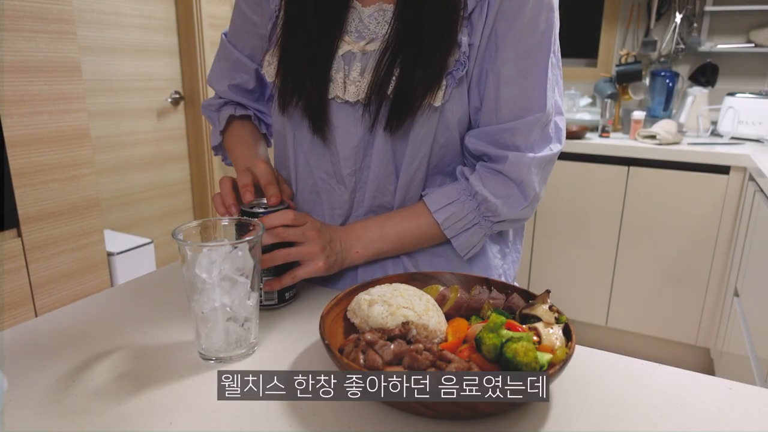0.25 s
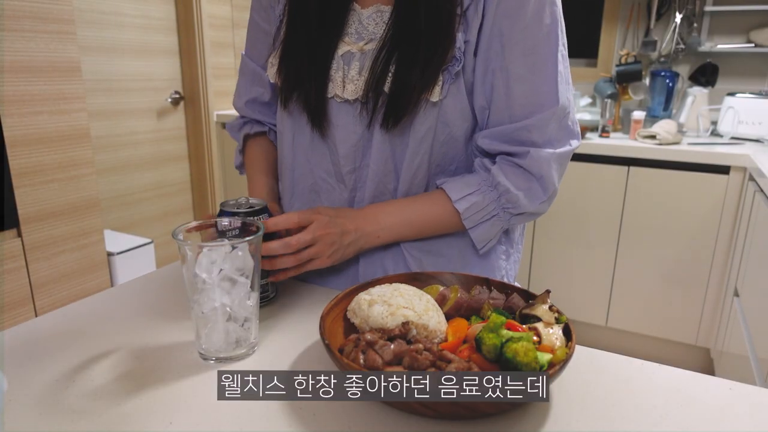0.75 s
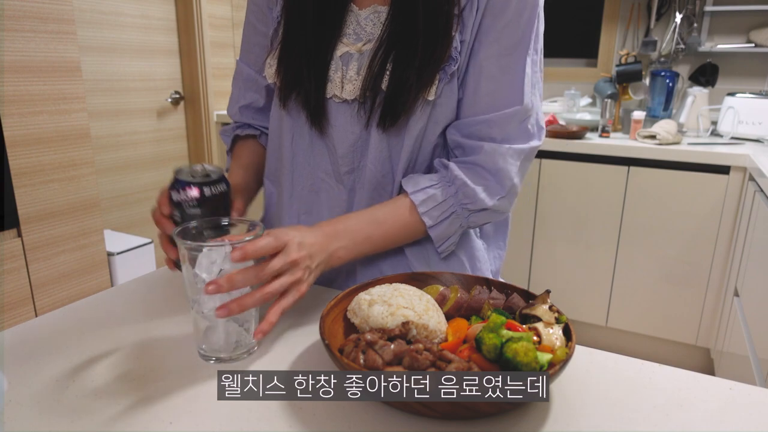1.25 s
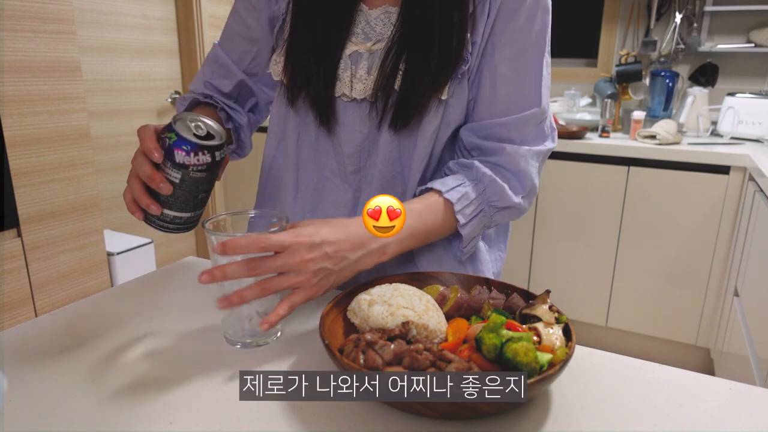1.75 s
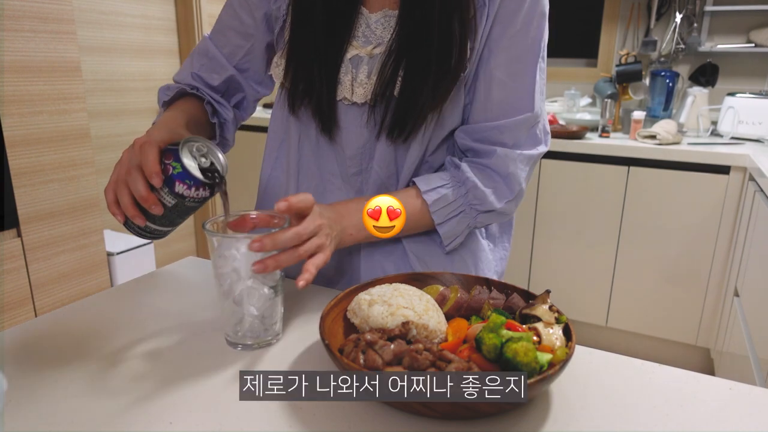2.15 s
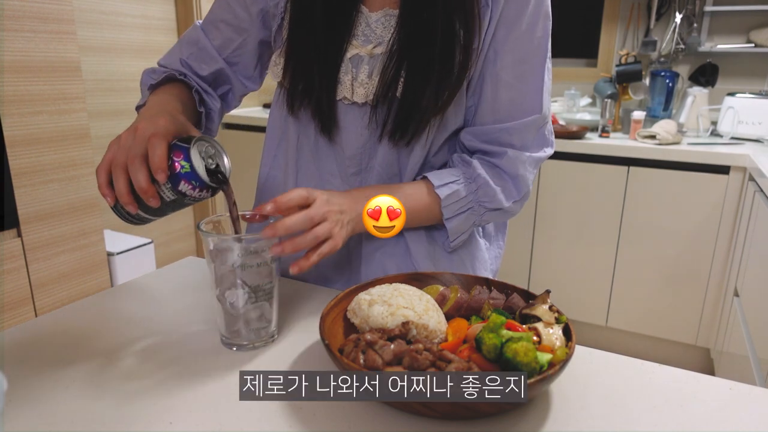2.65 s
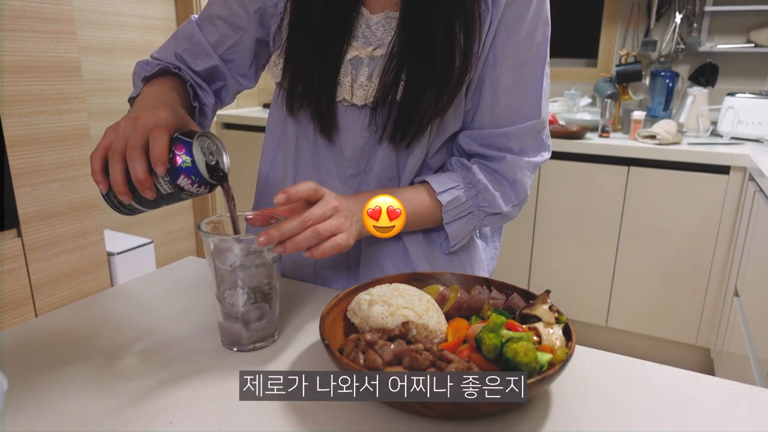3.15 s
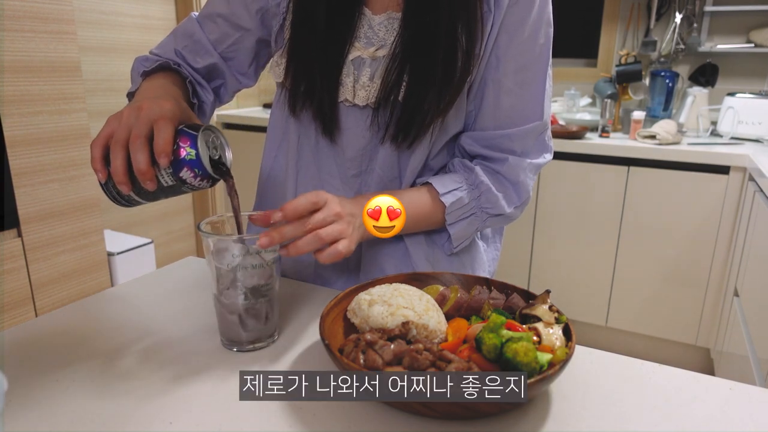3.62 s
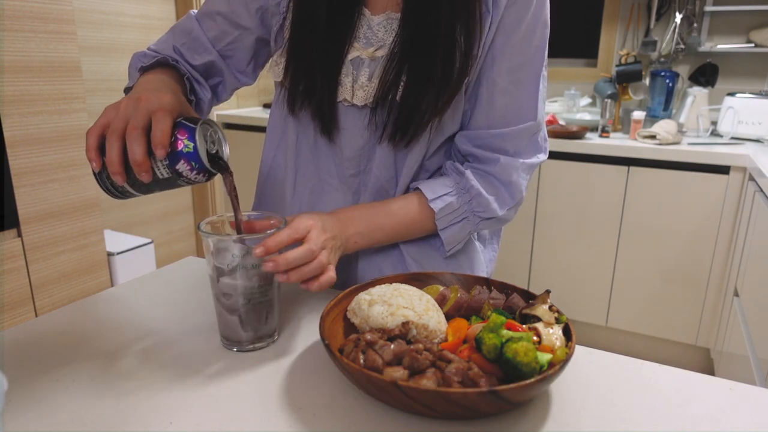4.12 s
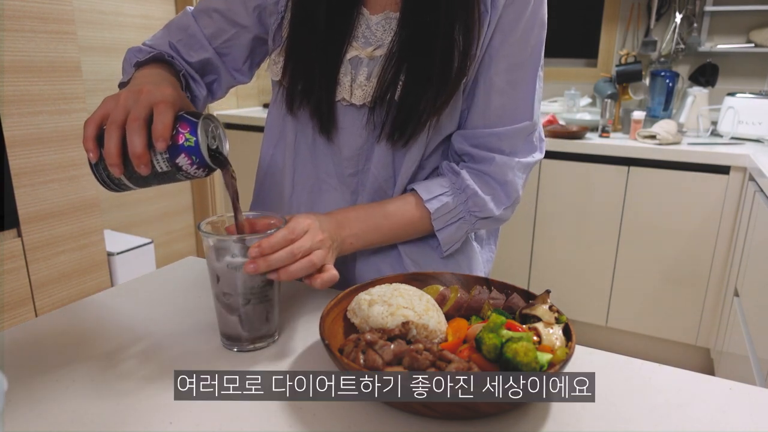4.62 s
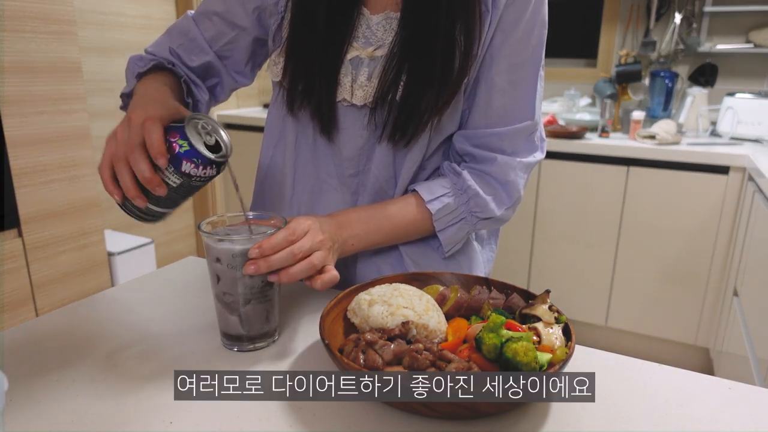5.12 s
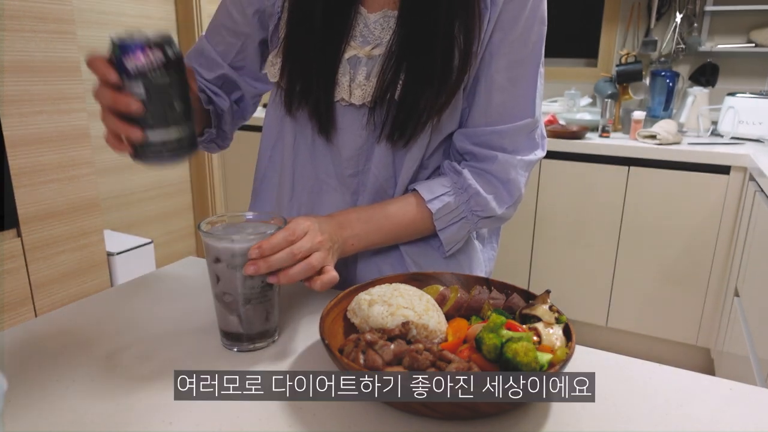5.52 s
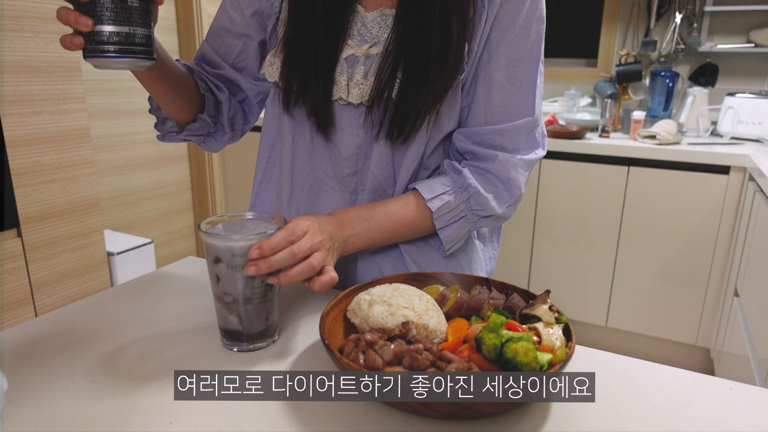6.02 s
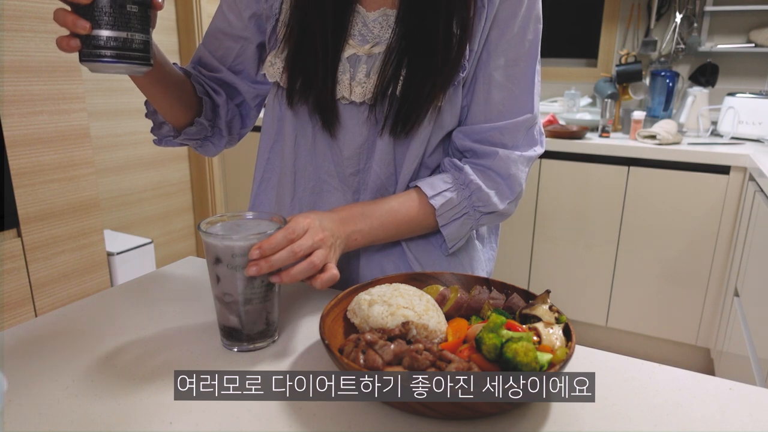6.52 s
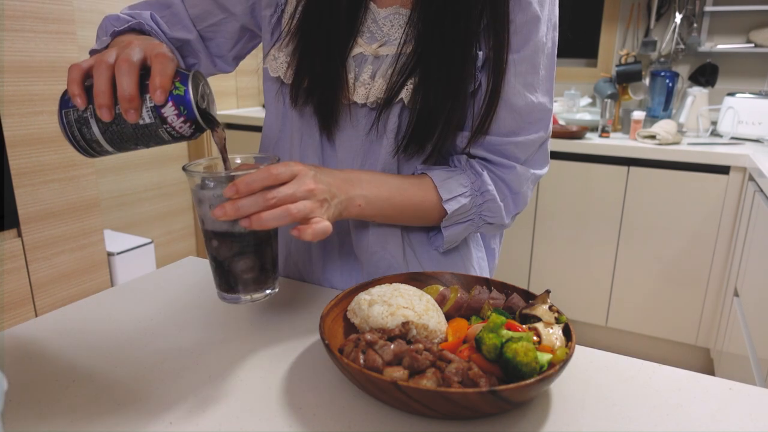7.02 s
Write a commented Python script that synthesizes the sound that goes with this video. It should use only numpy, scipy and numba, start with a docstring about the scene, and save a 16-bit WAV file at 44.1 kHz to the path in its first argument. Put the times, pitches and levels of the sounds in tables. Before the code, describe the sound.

A soda can snaps open, a glass knocks on a table, and soda pours over cracking ice with a swelling fizz.

```python
"""In a hard-walled kitchen, a soda can snaps open and a glass of ice slides and knocks twice on the table. The
soda trickles in: bubbles ping, the cubes crack and tick, and the shrinking air column rises in pitch. The tiny
bursts of the fizz swell and merge into a smooth hiss of foam, which drops abruptly to a finer, softer one near
the end."""
import sys
import numpy as np
from scipy import signal
from scipy.fft import rfft, irfft, next_fast_len
from scipy.io import wavfile
from scipy.ndimage import uniform_filter1d
from numba import njit

SR = 44100
rng = np.random.default_rng(int(sys.argv[2]) if len(sys.argv) > 2 else 0)


def wav_out(sig):
    """Save sig, one row per channel (or a flat mono array), as 16-bit PCM at SR to the path in sys.argv[1]."""
    wavfile.write(sys.argv[1], SR, np.round(np.clip(np.atleast_2d(sig).T, -1, 1) * 32767).astype(np.int16))


N = 320607
TIME = np.arange(N) / SR
POUR_S, COVERED_S = 2.36, 4.35   # the soda first meets the ice, then covers it


def from_db(db):
    """Decibels to gain."""
    return 10 ** (np.asarray(db) / 20)


def rms_one(x):
    """Scale to unit power."""
    return x / np.sqrt(np.mean(x ** 2) + 1e-20)


def at_hz(points, hz):
    """Read a curve on a log-frequency axis."""
    knots_hz, values = np.transpose(points)
    return np.interp(np.log(np.maximum(hz, 1)), np.log(knots_hz), values)


def add(track, s, sound):
    """Mix a sound in at a time."""
    start = int(round(s * SR))
    track[start:start + len(sound)] += sound[:N - start]


def drift(per_s):
    """A wobble that glides between random values."""
    knots = rng.standard_normal(4096)
    return np.interp(TIME * per_s, np.arange(len(knots)), knots)


def grains(per_s, spread_db):
    """Random clicks of uneven size."""
    sizes = from_db(spread_db * np.minimum(rng.exponential(1, N), 4)) * rng.choice([-1, 1], N)
    return sizes * (rng.random(N) < per_s / SR)


def strokes(rows, rise_db_per_s, fall_db_per_s):
    """Envelope of gestures that each swell, hold and die away."""
    gain = np.zeros(N)
    for start, end, db in rows:
        before, after = np.maximum(start - TIME, 0), np.maximum(TIME - end, 0)
        gain += from_db(db - rise_db_per_s * before - fall_db_per_s * after)
    return gain


@njit
def resonate(x, angle, radius):
    """A two-pole resonance whose pitch may move."""
    y = np.zeros(len(x))
    for i in range(2, len(x)):
        y[i] = x[i] - x[i - 2] + 2 * radius * np.cos(angle[i]) * y[i - 1] - radius * radius * y[i - 2]
    return y


def hollow(x, hz, width_hz):
    """The ring of a cavity or shell, at unit power."""
    angle = 2 * np.pi * hz / SR * np.ones(N)
    return rms_one(resonate(x, angle, np.exp(-np.pi * width_hz / SR)))


def contact(colour, length_s=1, grit=0, size=4096):
    """An impact: a coloured click, with grit from micro-slips that die 20 dB over length_s."""
    hz = np.arange(size // 2 + 1) * SR / size
    slips = rng.standard_normal(size) * from_db(-20 * TIME[:size] / length_s)
    force = 1 + grit * rfft(slips) / np.linalg.norm(slips)
    # divide out the ripple, so the slips smear the hit without colouring it
    ripple = np.sqrt(uniform_filter1d(np.abs(force) ** 2, size=25))
    cepstrum = irfft(np.log(from_db(at_hz(colour, hz)) / ripple))
    cepstrum[1:size // 2] *= 2   # minimum phase keeps the attack sharp
    cepstrum[size // 2 + 1:] = 0
    pulse = irfft(force * np.exp(rfft(cepstrum)))
    return pulse / np.linalg.norm(pulse) * np.sqrt(.004 * SR)   # the energy of 4 ms at unit power


def ring(modes, sag=0, sag_s=0.0793):
    """Damped sines of a struck body, whose pitch sinks by the share sag as it settles."""
    t = TIME[:SR]
    bend = 1 - sag * (1 - np.exp(-t / sag_s))
    phase_per_hz = 2 * np.pi * np.cumsum(bend) / SR
    return sum((-1) ** k * from_db(db - 60 * t / t60) * np.sin(hz * phase_per_hz)
               for k, (hz, db, t60) in enumerate(modes))


def ping(hz, cycles):
    """A sine that swells in about a cycle and dies 60 dB over the given cycles."""
    turns = hz * TIME[:SR // 8]
    return np.sin(2 * np.pi * turns) * (1 - np.exp(-turns)) * from_db(-60 * turns / cycles)


def snaps(rows, send_db):
    """Bursts around one pitch; the narrower, the more they ring. Gives direct sound and reverb send."""
    direct, send = np.zeros((2, N))
    hz = np.geomspace(20, 20000, 120)
    for s, db, centre_hz, octaves, length_s in rows:
        hump = np.c_[hz, -15 * np.log10(1 + (np.log2(hz / centre_hz) / octaves) ** 4)]
        note = ping(centre_hz, cycles=55 * np.sqrt(centre_hz / 1000)) / (.5 + octaves)
        burst = contact(hump, length_s, grit=length_s / .0012)   # longer contacts are mostly slip
        add(direct, s, from_db(db + 0.5) * burst)
        add(direct, s, from_db(db) * note)
        add(send, s, from_db(db + send_db) * contact(hump))
    return np.array([direct, send])


# stereo width of the textures: (frequency [Hz], side minus mid [dB])
TEXTURE_WIDTH = [(60, -2), (130, -2.5), (290, -6.5), (640, -2.5), (1410, -4), (3100, -12.5), (6820, -14),
                 (15000, -13.5)]


def stereo(source, colour):
    """EQ a flat source and widen it with diffuse noise, at unit power."""
    size = next_fast_len(N)
    hz = np.arange(size // 2 + 1) * SR / size
    gain = from_db(at_hz(colour, hz))
    side_gain = gain * from_db(at_hz(TEXTURE_WIDTH, hz))
    mid = irfft(rfft(rms_one(source), size) * gain, size)[:N]
    side = irfft(rfft(rng.standard_normal(size)) * side_gain, size)[:N]
    return rms_one(np.array([mid + side, mid - side]))


# dark bed of room noise: (frequency [Hz], level [dB])
ROOM_TONE_EQ = [(25, -24), (60, -14.5), (110, -7), (180, 1.5), (400, -0.5), (650, -1.5), (850, -7),
                (1050, -1.5), (1350, -8.5), (2500, -10.5), (5000, -19), (10000, -23), (16000, -26)]


def room_tone():
    """A faint, steady hush under everything."""
    return from_db(-58) * stereo(rng.standard_normal(N), ROOM_TONE_EQ)


# the hand scuffs the can: (start [s], end [s], level [dB])
RUB_CUES = [(0, .005, -54), (.37, .38, -53.5), (.48, .64, -46), (.79, .99, -53)]
# metallic rasp of a scuff: (frequency [Hz], level [dB])
RUB_EQ = [(530, -48), (900, -18), (1220, -1), (1410, -20), (1510, -4.5), (1980, -8.5), (2790, -2.5),
          (3570, -14), (3970, -21), (5850, -12), (6740, -17.5), (9040, -18), (15000, -41)]
# the can's body, headspace and lid: (frequency [Hz], bandwidth [Hz], level [dB])
CAN_RESONANCES = [(346, 110, -9.5), (1530, 57, -5), (2840, 110, -15), (3260, 160, -25), (6170, 400, -31)]


def can_rubs():
    """Stick-slip under the hand judders and sets the can ringing."""
    slips = grains(6000, spread_db=3.0)
    ringing = sum(from_db(db) * hollow(slips, hz, width) for hz, width, db in CAN_RESONANCES)
    judder = from_db(2.4 * drift(70))
    envelope = strokes(RUB_CUES, rise_db_per_s=122, fall_db_per_s=138)
    return envelope * judder * (0.5 * stereo(slips, RUB_EQ) + 0.58 * ringing)


# hits on the can: (time [s], level [dB], centre [Hz], width [octaves], length [s])
CAN_HITS = [(0.2657, -37.5, 3020, 1.3, 0.0051), (0.513, -40.5, 2870, 0.45, 0.041),
            (0.647, -47.5, 2000, 1.25, 0.016), (0.862, -42.5, 1640, 0.73, 0.018),
            (0.869, -42, 217, 0.82, 0.044), (1.289, -59, 1920, 0.24, .008)]
# twang of the ring pull: (frequency [Hz], level [dB], 60 dB decay [s])
RING_PULL_MODES = [(1172, -40, 0.16), (2880, -33.5, 0.027)]


def can_snaps():
    """The can snaps open, buckles and bumps the table; the ring pull rings on after the first snap."""
    direct, send = snaps(CAN_HITS, send_db=0.5)
    add(direct, s=.2655, sound=ring(RING_PULL_MODES))
    return np.array([direct, send])


# pushes of the glass: (start [s], end [s], level [dB])
SLIDE_CUES = [(1.33, 1.4, -68), (1.525, 1.56, -48.5), (1.645, 1.685, -44)]
# dull scrape of glass on table: (frequency [Hz], level [dB])
SLIDE_EQ = [(100, -23), (300, -6), (700, -5.5), (1050, -2.5), (1450, -16), (2200, -14), (3200, -27),
            (8000, -45)]


def glass_slide():
    """The glass rubs smoothly over the table in short swells of friction noise."""
    envelope = strokes(SLIDE_CUES, rise_db_per_s=237, fall_db_per_s=222)
    return envelope * stereo(rng.standard_normal(N), SLIDE_EQ)


# the glass lands: (time [s], level [dB], low-pass [Hz], reverb send [dB])
KNOCK_HITS = [(1.6551, -30, 1290, -7), (1.6974, -14.5, 9000, 1.5), (1.719, -24.5, 2500, -4),
              (2.218, -39.5, 1000, 8.5), (2.2585, -21.5, 5190, 2), (2.2642, -21, 3640, -16),
              (6.258, -43.5, 803, 2)]
# attack of a knock: (frequency [Hz], level [dB])
KNOCK_EQ = [(40, -29), (100, -16.5), (165, -10.5), (250, -9), (420, -8), (550, -9.5), (700, 3), (850, -4.5),
            (1050, 2), (1550, -0.5), (1900, -3), (2400, -3), (3100, -11), (4000, -16), (6500, -32),
            (12000, -51)]
# ring of glass and table top: (frequency [Hz], level [dB], 60 dB decay [s])
KNOCK_MODES = [(166.5, -20.5, 0.36), (198.5, -18.5, 0.35), (379.5, -20, 0.19), (457, -14.5, 0.2),
               (677, -14, 0.29), (1025, -8.5, 0.14), (1225, -13, 0.19), (1320, -9, 0.09), (1490, -23, 0.12),
               (2190, -18.5, 0.46), (2520, -24, .3)]


def glass_knocks():
    """The thick glass base meets the table and both ring; light touches are duller."""
    direct, send = np.zeros((2, N))
    for s, db, edge_hz, send_db in KNOCK_HITS:
        lowpass = signal.butter(2, edge_hz, fs=SR)
        attack = signal.lfilter(*lowpass, contact(KNOCK_EQ, length_s=0.0075, grit=6.0))
        add(direct, s, from_db(db) * attack)
        add(direct, s, from_db(db - 2.5) * ring(KNOCK_MODES))
        add(send, s, from_db(db + send_db) * signal.lfilter(*lowpass, contact(KNOCK_EQ)))
    return np.array([direct, send])


def foam_share(half_s=4.34, forming_s=0.25):
    """How much of the surface the foam head covers, 0-1."""
    return .5 + .5 * np.tanh((TIME - half_s) / (2 * forming_s))


# sizzle on bare ice: (frequency [Hz], level [dB])
SIZZLE_EQ = [(1120, -17), (1900, 2), (2210, -17), (2840, -1), (3420, -22), (4510, -2), (5390, -14),
             (7110, -2.5), (7910, -6), (12400, -7.5), (15200, -16.5), (16000, -15)]
# hiss of foam: (frequency [Hz], level [dB])
FOAM_EQ = [(1120, -35), (1900, -9.5), (2270, -10), (2640, -8.5), (3050, -8.5), (3680, -3), (4310, 1.5),
           (5110, 0), (5890, -1.5), (7370, 0.5), (8500, -4), (9710, -2.5), (10800, -8), (14600, -13),
           (16000, -20)]
SOFTER_S = 6.846


def fizz(full_db=-43, growth_db=24, growth_s=1.54):
    """Tiny bursts hiss in the tilted can, sizzle on the ice, then merge into foam until the hiss turns abruptly
    softer."""
    sizzle = stereo(grains(7000, spread_db=3.5), SIZZLE_EQ)
    hiss = stereo(rng.standard_normal(N), FOAM_EQ)
    in_can = strokes([(1.78, POUR_S, -68.5)], rise_db_per_s=110, fall_db_per_s=100) * hiss
    foam = foam_share()
    blend = np.sqrt(1 - foam) * sizzle + np.sqrt(foam) * hiss
    swell = from_db(full_db - growth_db * np.exp((POUR_S - TIME) / growth_s))
    gate = (TIME > POUR_S) & (TIME < SOFTER_S)
    return in_can + gate * swell * blend


def bubbles(per_s):
    """Bubbles trapped by the stream ring briefly, each at the pitch of its size."""
    births, out = grains(per_s, spread_db=-1.0), np.zeros(N)
    born = np.flatnonzero(births)
    pitches = np.clip(5300 * 2 ** (0.415 * rng.standard_normal(len(born))), 2000, 13000)
    for at, hz in zip(born, pitches):
        add(out, at / SR, births[at] * ping(hz, cycles=36))
    return rms_one(out / np.sqrt(per_s))


def air_column(splash, empty_m=0.11, full_m=.043, sound_m_per_s=343):
    """Splashing sounds the quarter-wave note of the shrinking air above the soda."""
    progress = np.clip((TIME - POUR_S) / (COVERED_S - POUR_S), 0, 1)
    filled = progress ** 1.57   # the can tips further, so the glass fills ever faster
    hz = sound_m_per_s / (4 * (empty_m + filled * (full_m - empty_m)))
    return hollow(hollow(splash, hz, width_hz=1160), hz, width_hz=1040)


# fader ride of the splashing, which the rising foam smothers: (time [s], level [dB])
SPLASH_RIDE = [(2.3, -91), (2.42, -63), (3.15, -57.5), (3.6, -47), (4.27, -49.5), (4.4, -57.5), (4.6, -53),
               (4.8, -65.5), (6.7, -60.5), (7.27, -64)]


def pour(peak_bubbles_per_s=230, foam_mute_db=13):
    """The uneven stream traps bubbles and gurgles in the air column, both more as it splashes harder."""
    splash_db = np.interp(TIME, *np.transpose(SPLASH_RIDE))
    vigour_db = .7 * (splash_db - splash_db.max())
    activity = from_db(vigour_db / 2)
    per_s = peak_bubbles_per_s * activity
    spatter = rms_one(grains(3 * per_s, spread_db=6.0) / np.sqrt(per_s))
    splash = spatter + 0.42 * rng.standard_normal(N)
    gurgle_db = 3.0 * drift(35) * activity
    bubble_db = -50.5 + vigour_db - foam_mute_db * foam_share()
    return from_db(bubble_db) * bubbles(per_s) + from_db(splash_db + gurgle_db) * air_column(splash)


def plinks(per_s=22, centre_hz=6000, octaves=0.12, length_s=0.0093):
    """Droplets make faint, glassy plinks at random while the ice is still bare."""
    slots = np.arange(POUR_S, COVERED_S, 1 / per_s)
    fades_db = 8 * np.linspace(-1, 1, len(slots)) ** 2   # weaker at first and as the ice goes under
    rows = []
    for s, fade_db in zip(slots, fades_db):
        late, size, pitch = rng.uniform(-1, 1, 3)
        db = -46 + 2.5 * size - fade_db
        hz = centre_hz * 2 ** (0.79 * pitch)
        rows.append((s + (1 + late) / per_s, db, hz, octaves, length_s))
    return snaps(rows, send_db=-3)


# spot drips and blips: (time [s], level [dB], pitch [Hz])
DROP_HITS = [(2.4852, -38, 2210), (2.5714, -45.5, 2000), (2.652, -29, 2230), (3.726, -40.5, 4420),
             (4.2635, -36.5, 2000), (4.844, -42.5, 526)]


def drops(octaves=0.32, length_s=0.0093):
    """Single drops and large bubbles each ring at one pitch."""
    return snaps([(*drop, octaves, length_s) for drop in DROP_HITS], send_db=-3)


# two big cracks: (time [s], level [dB], rebound delay [s], rebound gain [dB], reverb send [dB])
SPLIT_HITS = [(2.783, -17, 0.0066, -9, -1), (3.5732, -14, 0.0092, -7.5, -3.5)]
# attack of each cube: (frequency [Hz], level [dB])
FIRST_CUBE_EQ = [(60, -49), (150, -14), (300, -13.5), (610, -9), (1000, -18), (1300, -4), (1500, 2.5),
                 (1800, -5), (2200, -9), (2700, -8.5), (3500, -11), (4600, -10.5), (6000, -18.5),
                 (8700, -18), (10500, -28), (13300, -26), (16000, -42)]
SECOND_CUBE_EQ = [(60, -43), (170, -17.5), (450, -16.5), (700, -17), (1010, 5), (1400, -11), (1650, -4.5),
                  (2150, -3.5), (2700, -12.5), (3500, -11), (5000, -14), (6100, -5.5), (7500, -15),
                  (11000, -28.5), (12700, -24), (16000, -39)]
# ring of each cube: (frequency [Hz], level [dB], 60 dB decay [s])
FIRST_CUBE_MODES = [(627, -25, 0.5), (1504, -9, 0.44), (1660, -2, 0.12), (2600, -17, .2), (4260, -16, 0.13)]
SECOND_CUBE_MODES = [(870, -23, 0.41), (994, -13.5, 0.31), (1078, -17, 0.3), (1142, -12, 0.22),
                     (1680, -21, 0.13), (1960, -30, 0.22), (2030, 1, 0.064), (2210, -4.5, 0.1),
                     (2280, -23, 0.23), (3580, -20, 0.17), (5970, -12.5, .28), (6220, -17, 0.31),
                     (12300, -27, 0.19)]


def ice_splits():
    """The soda splits two cubes; each rings in the glass and rebounds on its neighbour."""
    direct, send = np.zeros((2, N))
    cubes = (FIRST_CUBE_EQ, ring(FIRST_CUBE_MODES, sag=0.12)), (SECOND_CUBE_EQ, ring(SECOND_CUBE_MODES))
    for (s, db, rebound_s, rebound_db, send_db), (colour, ringing) in zip(SPLIT_HITS, cubes):
        add(direct, s, from_db(db) * contact(colour, length_s=0.006, grit=5.3))
        add(direct, s + rebound_s, from_db(db + rebound_db) * contact(colour, length_s=.008, grit=2.8))
        add(direct, s, from_db(db - 4.5) * ringing)
        add(send, s, from_db(db + send_db) * contact(colour))
    return np.array([direct, send])


# small cracks: (time [s], level [dB], centre [Hz], width [octaves])
TICK_HITS = [(2.821, -27, 12700, 0.81), (2.961, -38.5, 9100, 1.4), (3.367, -32.5, 4720, 0.53),
             (3.458, -28.5, 8130, 1.8), (3.4653, -26, 4400, 1.2), (3.8464, -34, 2980, 1.7),
             (3.879, -34.5, 6250, 0.66), (4.0353, -31, 6500, 0.94)]


def ice_ticks(length_s=0.0039):
    """Small cracks in the ice give short, bright ticks."""
    return snaps([(*tick, length_s) for tick in TICK_HITS], send_db=-4.5)


# bumps of floating ice: (time [s], level [dB], length [s])
NUDGE_HITS = [(4.515, -41.5, 0.023), (5.232, -41, 0.022), (6.257, -33, .006)]


def ice_nudges(hz=2050, octaves=0.84):
    """Floating cubes nudge each other and the glass, dull and gritty."""
    return snaps([(s, db, hz, octaves, length_s) for s, db, length_s in NUDGE_HITS], send_db=-0.5)


# softer closing hiss: (frequency [Hz], level [dB])
SOFT_FIZZ_EQ = [(1240, -26), (2100, -10), (2250, -32), (2510, -25), (2760, -7), (3240, -3.5), (4110, -5.5),
                (4630, 0), (5440, -3.5), (6020, 1.5), (6840, -4), (9770, -6), (10600, -11), (13800, -16),
                (16000, -26)]


def softer_fizz():
    """Abruptly, a finer, softer fizz takes over."""
    return (TIME >= SOFTER_S) * from_db(-49) * stereo(grains(25000, spread_db=1.5), SOFT_FIZZ_EQ)


# sheen of the glass: (frequency [Hz], bandwidth [Hz], level [dB])
GLASS_RESONANCES = [(4450, 110, -8), (4680, 86, -13), (6180, 83, -8), (7640, 240, -13)]


def in_glass(x):
    """Ticks and bubbles inside the glass set its high resonances ringing."""
    ringing = sum(from_db(db) * signal.lfilter(*signal.iirpeak(hz, hz / width, fs=SR), x + 1e-18)
                  for hz, width, db in GLASS_RESONANCES)
    return 0.74 * x + 1.65 * ringing


def table_bounce(x, db, length_s):
    """Glancing reflections from the table reach left and right differently."""
    t = TIME[:SR // 20]
    scatter = rng.standard_normal(len(t)) * t * from_db(-20 * t / length_s)
    side = from_db(db) * signal.fftconvolve(x, scatter / np.linalg.norm(scatter))[:N]
    return np.array([x + side, x - side])


# reverb time of the kitchen: (frequency [Hz], 60 dB decay [s])
REVERB_DECAY = [(100, 1), (300, 1), (800, 0.49), (2000, 0.81), (5000, 0.6), (15000, 0.72)]
# stereo width of the reverb: (frequency [Hz], side minus mid [dB])
REVERB_WIDTH = [(60, -9), (130, -15), (290, -12), (640, -8.5), (1410, -12.5), (3100, -10.5), (6820, -7.5),
                (15000, -10)]


def kitchen(x, early_db, early_s, gap_s):
    """Dense near reflections from table and cupboards, then a tail that dies band by band."""
    t, hz = TIME[:SR], np.arange(SR // 2 + 1)
    centres = np.geomspace(60, 16000, 9)
    noise, tail = rfft(rng.standard_normal((2, SR))), 0
    noise[1] *= from_db(at_hz(REVERB_WIDTH, hz))
    for centre, share in zip(centres, np.eye(len(centres))):
        band = irfft(noise * at_hz(np.c_[centres, share], hz), SR)
        tail = tail + band * from_db(-60 * t / at_hz(REVERB_DECAY, centre))
    tail *= 1 + from_db(early_db) * np.exp(-t / early_s)
    tail *= np.clip(t / gap_s - 1, 0, 1)   # pre-delay
    mid, side = tail / np.linalg.norm(tail[0])
    return signal.fftconvolve([x, x], [mid + side, mid - side], axes=1)[:, :N]


def scene():
    """Hits and pour sit up close with kitchen reverb; fizz, friction and room tone stay dry."""
    hits = glass_knocks() + ice_splits() + can_snaps()
    direct, send = hits + in_glass(ice_ticks() + ice_nudges() + drops() + plinks())
    liquid = in_glass(pour())
    near = table_bounce(direct + from_db(-3.5) * liquid, db=-27.0, length_s=0.0029)
    room = kitchen(send + from_db(-4.0) * liquid, early_db=0.5, early_s=0.034, gap_s=0.0025)
    return near + room + fizz() + softer_fizz() + can_rubs() + glass_slide() + room_tone()


def record(dry, low_cut_hz=88, high_cut_hz=16000):
    """The small microphone loses the bass; the top is cut steeply."""
    thin = signal.sosfilt(signal.butter(2, low_cut_hz, "high", fs=SR, output="sos"), dry)
    return signal.sosfilt(signal.ellip(10, .2, 70, high_cut_hz, fs=SR, output="sos"), thin)


dry = scene()
out = record(dry)
wav_out(out)
```